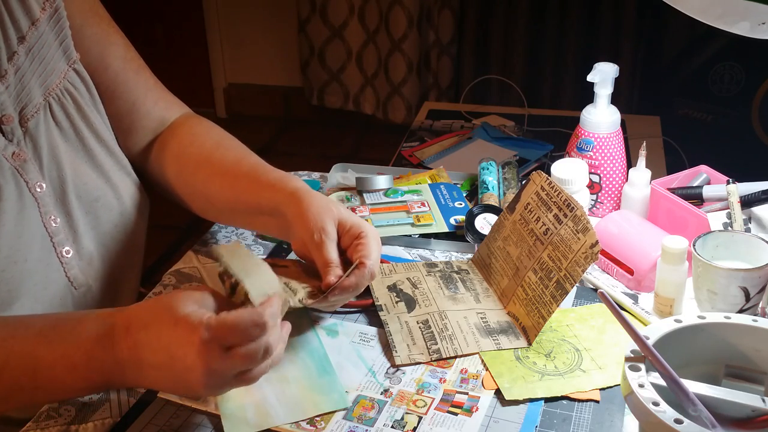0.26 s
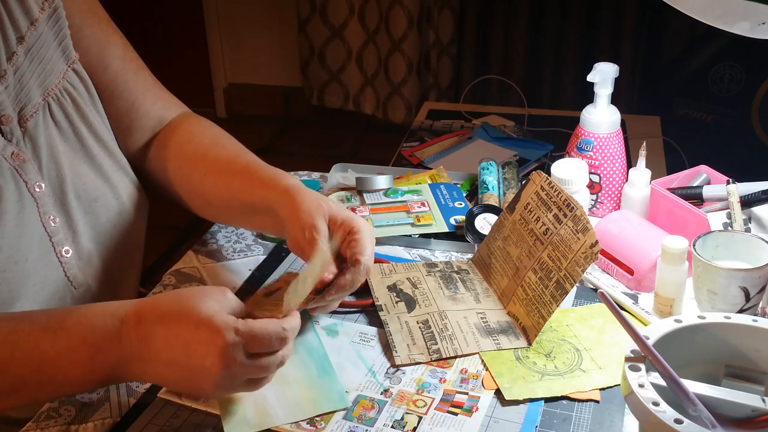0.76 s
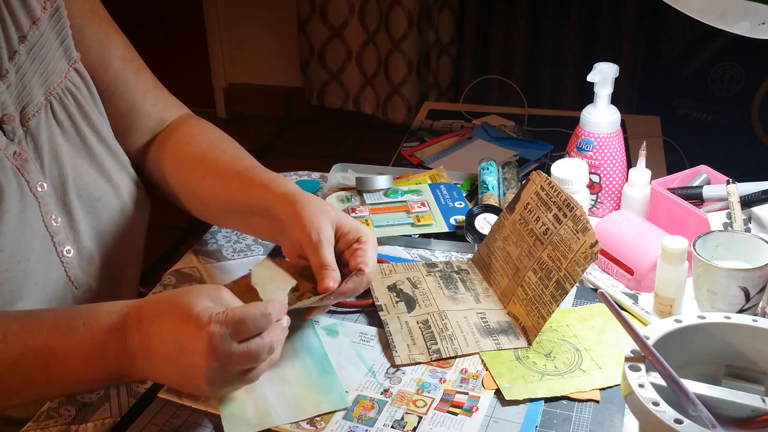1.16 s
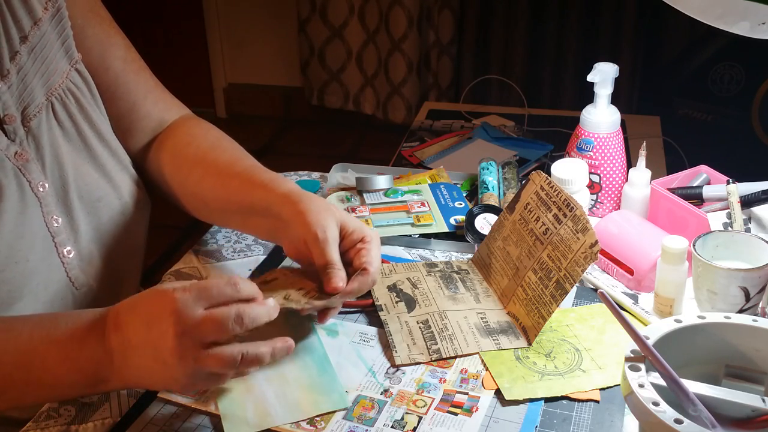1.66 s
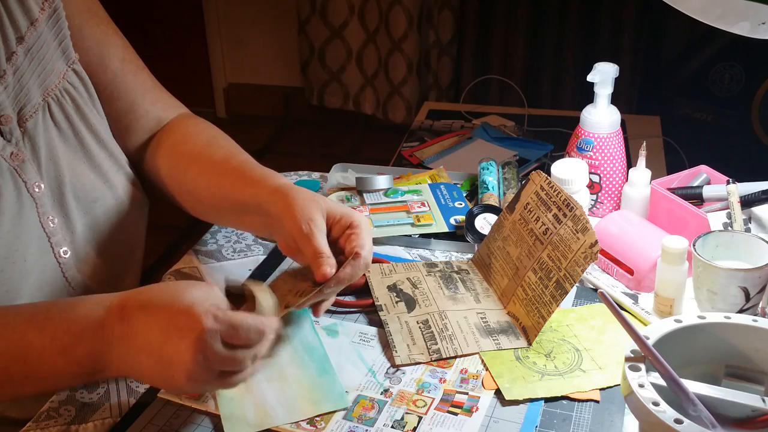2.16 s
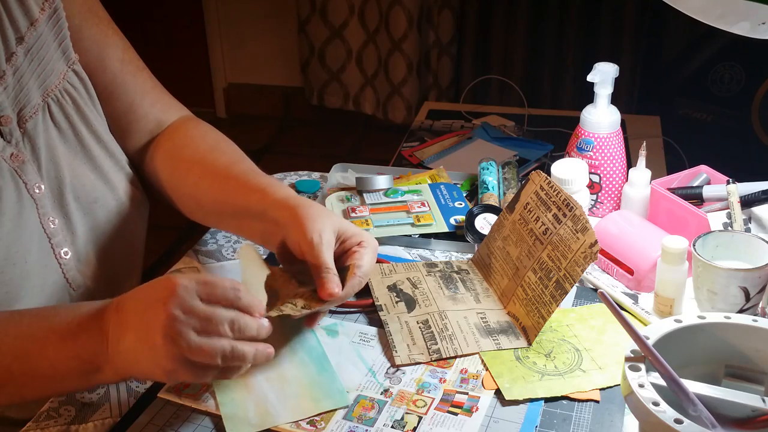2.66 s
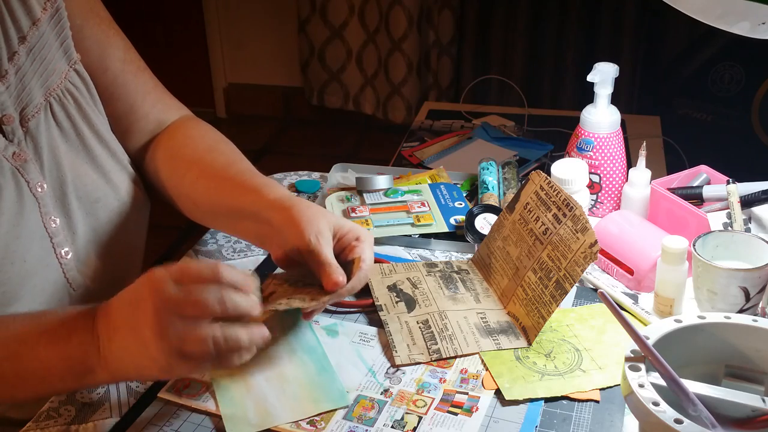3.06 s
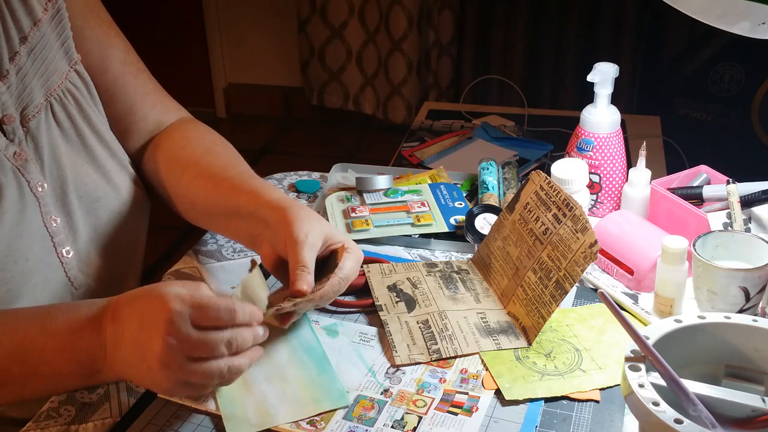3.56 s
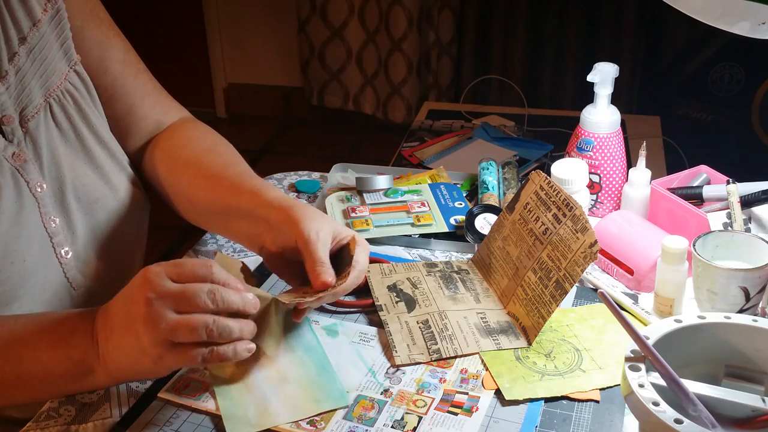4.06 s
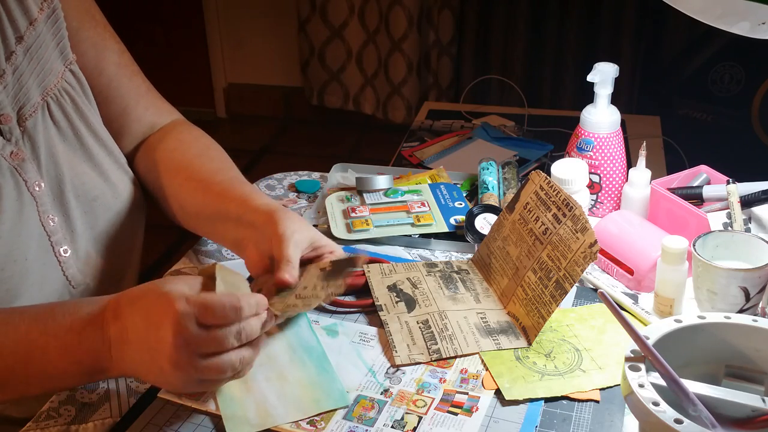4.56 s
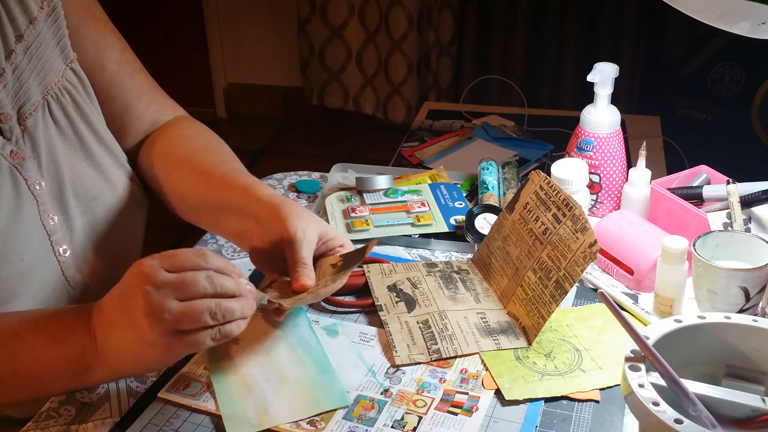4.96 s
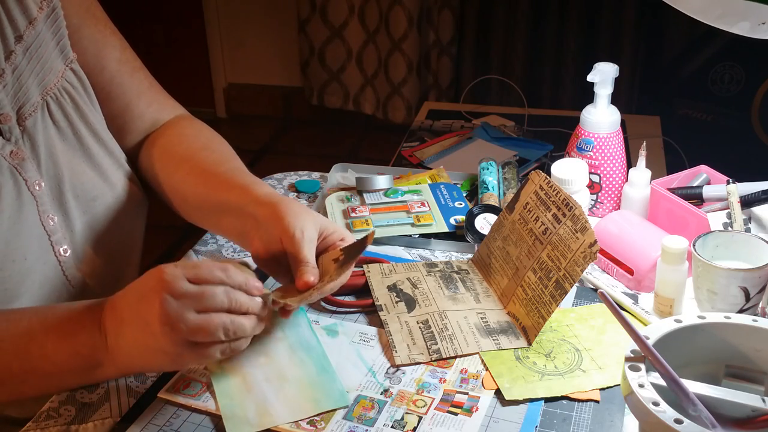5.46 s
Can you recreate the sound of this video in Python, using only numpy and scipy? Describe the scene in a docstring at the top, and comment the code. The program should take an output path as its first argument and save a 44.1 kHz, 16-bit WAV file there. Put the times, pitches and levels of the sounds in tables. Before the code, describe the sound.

Hands tear strips from stiff brown paper in short crisp pulls, with sharp snaps and light rustling, close up in a small room.

```python
"""Craft table in a small room: hands tear narrow strips off a sheet of brown paper in short pulls.
Each pull is a run of breaking fibres (dense random ringing grains); between pulls the grip shifts and rustles.
The stiff sheet snaps (noise cracks plus a flap) and buckles (resonant pops); an arm rubs the table dully.
Table and room answer with decaying noise, over air noise, a low hum and a faint whine.
A camera with two microphone ports stands close by; each port rings in the treble."""
import sys
import numpy as np
from scipy import signal
from scipy.fft import rfft, irfft, next_fast_len
from scipy.io import wavfile
from scipy.ndimage import uniform_filter1d, map_coordinates

SR = 44100
rng = np.random.default_rng(int(sys.argv[2]) if len(sys.argv) > 2 else 0)


def put_to_file(sound):
    """Save the sound as 16-bit audio at rate SR, in the file named by the first command-line argument."""
    columns = np.atleast_2d(sound).T  # one column per channel
    safe = np.clip(columns, -1, 1)
    whole_steps = np.round(safe * 32767)
    wavfile.write(sys.argv[1], SR, whole_steps.astype(np.int16))


N = 252482  # samples


def amp(db):
    """Decibels to gain."""
    return 10 ** (np.asarray(db) / 20)


def unit(x):
    """Scale x to rms 1."""
    return x / np.sqrt(np.mean(x ** 2) + 1e-20)


def along(points, hz):
    """Interpolate (f/Hz, value) points on a log frequency axis."""
    point_hz, values = np.transpose(points)
    return np.interp(np.log(hz + 1), np.log(point_hz), values)


def wobble(knots_per_s):
    """Smooth random curve through normal-distributed knots."""
    knots = rng.standard_normal(int(N * knots_per_s / SR) + 4)
    return map_coordinates(knots, [np.arange(N) * knots_per_s / SR])


def filtered(x, response):
    """Apply a complex response(hz) in the frequency domain."""
    size = next_fast_len(N + SR // 2)
    hz = np.fft.rfftfreq(size, 1 / SR)
    return irfft(rfft(x, size) * response(hz), size)[..., :N]


def add(track, start_s, sound):
    """Mix sound into track in place, cut at the track end."""
    part = track[max(round(start_s * SR), 0):][:len(sound)]
    part += sound[:len(part)]


SPLIT_HZ = 3000


def halves(x):
    """Split at SPLIT_HZ into crisp top and low body."""
    filters = [signal.butter(N=3, Wn=SPLIT_HZ, btype=side, fs=SR, output="sos") for side in ("high", "low")]
    return [signal.sosfilt(sos, x) for sos in filters]


def burst(t60_s):
    """Decaying noise puff of energy 1 with a nearly flat spectrum."""
    t = np.arange(SR // 20) / SR
    half_fade = amp(-30 * t / t60_s)  # applied twice: -60 dB at t60_s
    phases = np.angle(rfft(rng.standard_normal(len(t)) * half_fade))
    puff = irfft(np.exp(1j * phases), len(t)) * half_fade
    return puff / np.linalg.norm(puff)


def strokes(rows, start_db, end_db, onset_s, fade_s):
    """Gain curve per level column: each stroke swells to its peak, eases off and stops."""
    t, gains = np.arange(N) / SR, 0
    for start_s, rise_s, fall_s, *levels_db in rows:
        since = t - start_s
        force = amp(np.interp(since, [0, rise_s, rise_s + fall_s], [start_db, 0, end_db]))
        fade_in = np.clip(1 + since / onset_s, 0, 1)
        fade_out = np.clip(1 - (since - rise_s - fall_s) / fade_s, 0, 1)
        gains = gains + amp(levels_db)[:, None] * force * fade_in * fade_out
    return gains


def crackle(rate_hz, spread_db, clump_db, clump_hz, ring_s, spot_count):
    """Tiny breaks in clumps, each ringing like one of spot_count sheet spots: (crisp, body), rms 1."""
    happens = rng.random(N) < rate_hz / SR
    spread = spread_db * np.clip(rng.standard_normal(N), -2, 2)
    sizes = happens * amp(spread + clump_db * wobble(clump_hz))
    # the hand feeds in energy evenly, so big breaks are offset by lulls
    local_power = np.abs(uniform_filter1d(sizes ** 2, size=SR // 60))
    sizes = sizes / np.sqrt(local_power + 1e-6)
    spots = np.array([burst(ring_s)[:SR // 100] for _ in range(spot_count)])
    at = np.flatnonzero(sizes)
    signed_sizes = sizes[at] * rng.choice([-1, 1], len(at))
    breaks = signed_sizes[:, None] * spots[rng.integers(spot_count, size=len(at))]
    samples = at[:, None] + np.arange(breaks.shape[1])
    sound = np.bincount(samples.ravel(), breaks.ravel(), N)[:N]
    return np.array([unit(half) for half in halves(sound)])


# tearing pulls: t/s, tightening/s, easing/s, crisp level/dB, body level/dB (before trim)
TEAR_PULLS = [(0.164, 0.022, .048, -28, -39.5), (1.512, .035, 0.03, -44, -46),
              (1.7, 0.068, 0.059, -31.5, -36), (2.772, .028, .014, -32, -39.5),
              (2.936, .012, .115, -29, -36.5), (3.098, 0.0085, 0.023, -33, -41.5),
              (3.758, 0.029, .065, -30, -35), (3.878, 0.019, 0.059, -31, -39),
              (3.982, .09, 0.0573, -29, -37.5), (4.857, .004, 0.037, -34, -42.5),
              (4.963, 0.026, 0.064, -27.5, -36), (5.556, 0.046, 0.034, -32, -40),
              (5.69, 0.022, 0.052, -32, -43.5)]
CATCH_DB, LET_GO_DB = -7, -8  # start and end of a pull, re its hardest moment


def tearing(rate_hz=1400, usual_crisp_db=-35, trim_db=((-2,), (-3.2,))):
    """Fibres break by the thousand, in fits; a harder pull is louder and denser."""
    gains = strokes(TEAR_PULLS, CATCH_DB, LET_GO_DB, onset_s=0.0028, fade_s=0.0105)
    pace = np.clip(np.sqrt(gains[0] / amp(usual_crisp_db)), .5, 2)
    fibres = crackle(rate_hz * pace, spread_db=6, clump_db=5, clump_hz=230, ring_s=.003, spot_count=200)
    return np.sum(fibres * gains * amp(trim_db), axis=0)


# sheet snaps: t/s, level/dB, relative flap level/dB (before the gains in snaps)
SHEET_SNAPS = [(0.016, -36.5, -15), (0.031, -27.5, -19.5), (0.131, -23.5, -21), (0.15, -24, -23),
               (0.327, -20.5, -23.5), (0.585, -37.5, -14), (0.606, -46, -5.5), (0.998, -41.5, -16),
               (1.271, -47.5, -25), (1.386, -36, -26.5), (1.403, -23, -26.5), (1.47, -27, -18),
               (1.507, -27.5, -18), (1.547, -25, -29), (1.701, -22, -20.5), (1.727, -17, -23.5),
               (1.763, -18, -18), (1.8, -15, -20.5), (1.84, -22, -34), (2.306, -27, -35),
               (2.619, -33.5, -8.5), (2.641, -30, -19), (2.647, -13, -19), (2.769, -15, -22),
               (2.775, -22, -19.5), (2.795, -9.5, -28), (2.803, -18.5, -13.5), (2.9, -20, -21.5),
               (2.932, -15, -22), (2.939, -11.5, -21), (2.972, -33, -12), (3.013, -26, -13.5),
               (3.041, -24.5, -11), (3.081, -12.5, -24.5), (3.102, -23, -12.5), (3.173, -33, -14),
               (3.581, -32.5, -22), (3.735, -32.5, -21), (3.755, -16, -22.5), (3.787, -10.5, -22),
               (3.837, -25, -16), (3.874, -14.5, -19), (3.928, -25, -20), (3.98, -25, -20.5),
               (4.035, -30, -19), (4.073, -32, -10), (4.324, -35, -17.5), (4.855, -15.5, -21.5),
               (4.927, -22, -26), (4.943, -17.5, -24), (4.968, -14, -24), (5.192, -33.5, -16.5),
               (5.557, -30, -16), (5.598, -25, -16), (5.684, -20, -24), (5.693, -16.5, -23.5)]


def snaps(crack_t60_s=0.0044, rebound_mean_s=.0015, rebound_db=-6, flap_t60_s=0.037, crack_db=8, flap_db=21):
    """A crease gives way: sharp crack, a second one just after, and a longer flap of the sheet."""
    track = np.zeros(N)
    for start_s, level_db, body_db in SHEET_SNAPS:
        flap = halves(burst(flap_t60_s))[1]
        snap = amp(body_db + flap_db) * flap / np.linalg.norm(flap)
        crack = halves(burst(crack_t60_s))[0]
        add(snap, 0, amp(crack_db) * crack)
        rebound = halves(burst(crack_t60_s))[0]
        rebound_s = rebound_mean_s * (.5 + rng.random())
        add(snap, rebound_s, amp(crack_db + rebound_db) * rebound)
        add(track, start_s + .0005, amp(level_db) * snap)
    return track


# finger shifts: t/s, swelling/s, dying/s, crisp level/dB, body level/dB (before trim)
FINGER_SHIFTS = [(0.02, 0.017, 0.057, -51, -54), (0.122, 0.041, .01, -42, -49),
                 (0.268, 0.035, 0.016, -49, -47.5), (0.325, 0.031, 0.087, -44.5, -50),
                 (0.565, 0.05, .035, -54, -51), (0.68, 0.0072, 0.013, -58, -51),
                 (0.734, 0.004, 0.021, -47.5, -46.5), (0.85, 0.0068, .04, -61.5, -57),
                 (0.93, 0.093, 0.092, -58.5, -60.5), (1.675, .02, .01, -57, -55),
                 (1.84, 0.034, 0.044, -41.5, -46), (1.955, 0.019, 0.017, -44, -42.5),
                 (2.19, 0.036, 0.034, -68, -86), (2.302, 0.0093, 0.028, -42, -41.5),
                 (2.36, 0.028, 0.098, -54, -59), (2.48, 0.091, 0.14, -60, -57),
                 (2.622, 0.037, 0.06, -41.5, -46.5), (2.75, 0.017, .01, -43.5, -51),
                 (3.41, 0.0055, 0.029, -56, -60), (3.46, .04, 0.079, -61, -61.5),
                 (3.555, 0.035, 0.074, -53, -55.5), (3.695, 0.0082, 0.028, -62, -56),
                 (4.275, .05, 0.11, -52.5, -57), (4.44, 0.016, 0.11, -57, -65),
                 (4.66, .03, 0.024, -63, -67), (4.728, 0.023, 0.023, -52.5, -45),
                 (4.825, .025, 0.0046, -56.5, -55.5), (5.13, .065, 0.034, -53.5, -54),
                 (5.255, 0.022, 0.018, -60.5, -57.5), (5.335, 0.039, .01, -65, -61),
                 (5.39, .02, 0.022, -49, -54.5), (5.48, 0.081, .02, -52.5, -53)]
TOUCH_DB, LIFT_DB = -6.5, -13  # touch-down and lift-off, re the firmest moment


def rustling(trim_db=((-3,), (-4,))):
    """Paper slides over paper and fingertips in fine grains."""
    grains = crackle(rate_hz=2000, spread_db=8, clump_db=7.5, clump_hz=110, ring_s=0.0039, spot_count=200)
    gains = strokes(FINGER_SHIFTS, TOUCH_DB, LIFT_DB, onset_s=0.023, fade_s=0.0077)
    return np.sum(grains * gains * amp(trim_db), axis=0)


# soft pops of the bending sheet: t/s, level/dB (before pop and tick gains), f/Hz
SHEET_POPS = [(0.078, -40.5, 921), (0.293, -39.5, 1150), (0.587, -65, 930), (0.606, -42, 2480),
              (0.639, -51, 750), (0.735, -41.5, 2040), (0.962, -42.5, 1790), (1.03, -49.5, 1090),
              (1.408, -39.5, 1430), (1.473, -42, 1260), (1.513, -42.5, 770), (1.552, -46, 766),
              (1.972, -55, 1450), (2.033, -48, 1710), (2.068, -49.5, 2100), (2.278, -46.5, 2070),
              (2.547, -48, 1170), (2.586, -42.5, 947), (2.647, -40, 1810), (3.282, -50, 736),
              (3.551, -47, 1670), (3.58, -45, 915), (3.779, -30.5, 752), (3.788, -27, 1520),
              (4.325, -50.5, 1120), (4.459, -42.5, 2180), (4.508, -49.5, 743), (4.744, -47.5, 1577)]


def buckles(pop_t60_s=0.021, tick_t60_s=0.0084, q=1.6, pop_db=15, tick_db=2):
    """A patch flips over: a short puff through one broad resonance, applied twice, with a faint tick."""
    track = np.zeros(N)
    for start_s, level_db, hz in SHEET_POPS:
        patch = signal.iirpeak(hz, q, fs=SR)
        pop = signal.lfilter(*patch, signal.lfilter(*patch, burst(pop_t60_s)))
        pop = pop / np.linalg.norm(pop)
        tick = burst(tick_t60_s)
        add(track, start_s, amp(level_db + pop_db) * pop + amp(level_db + tick_db) * tick)
    return track


# forearm and sheet brush the table: t/s, swelling/s, dying/s, level/dB (before brush_db)
TABLE_BRUSHES = [(0.3, 0.097, 0.14, -54), (1.85, .15, .08, -61), (4.2, 0.14, 0.19, -55)]
# rub spectrum: f/Hz, relative density/dB
RUB_SPECTRUM = [(40, -14), (90, -4.5), (220, 1), (400, -15), (900, -16), (3000, -29.5)]


def brushing(brush_db=-3):
    """Dull, faint rub as the arm shifts: shaped noise in slow strokes."""
    rub = unit(filtered(rng.standard_normal(N), lambda hz: amp(along(RUB_SPECTRUM, hz))))
    gain = strokes(TABLE_BRUSHES, start_db=-1, end_db=-5, onset_s=0.019, fade_s=0.024)[0]
    return amp(brush_db) * rub * gain


# room decay: f/Hz, t60/s
ROOM_DECAY = [(200, 0.82), (1000, 0.31), (4000, 0.38), (9000, 0.3), (15000, 0.28)]


def tail():
    """Two-channel noise tail, left energy 1; decay time depends on frequency, longest in the bass."""
    hz, t, spectrum = signal.stft(rng.standard_normal((2, SR // 2)), SR, nperseg=256)
    decay = amp(-60 * t / along(ROOM_DECAY, hz)[:, None])
    wash = signal.istft(spectrum * decay, SR, nperseg=256)[1]
    wash = wash * np.clip(np.arange(wash.shape[1]) / SR / 0.0037, 0, 1)  # 3.7 ms build-up
    return wash / np.linalg.norm(wash[0])


def in_room(x, lead_ms=0.089, direct_db=-4.0, table_db=-1, table_t60_s=0.033, room_db=-3.5, slices=64):
    """Sound reaches the left port first; table clutter and walls answer anew as the hands move."""
    ports_sign = np.array([[1], [-1]])  # half the lead on each port
    direct = filtered(x, lambda hz: np.exp(1j * np.pi * hz * lead_ms / 10 ** 3 * ports_sign))
    echoes = np.zeros((2, N))
    for part in np.array_split(np.arange(N), slices):
        for ear, wash in zip(echoes, tail()):
            answer = amp(room_db) * wash
            add(answer, 0, amp(table_db) * burst(table_t60_s))
            add(ear, part[0] / SR + .0003, signal.fftconvolve(x[part], answer))
    return amp(direct_db) * direct + diffuse(echoes)


# likeness of the ports in diffuse sound: f/Hz, left-right correlation [-]
PORT_LIKENESS = [(50, 0.82), (300, 0.63), (700, 0.37), (1500, 0.13), (2500, 0)]


def diffuse(pair):
    """Sound from all around: the ports share the bass but get unrelated treble."""
    def mid_side_gains(hz):
        turn = np.arccos(np.clip(along(PORT_LIKENESS, hz), -1, 1)) / 2
        return np.array([np.cos(turn), np.sin(turn)])

    mid, side = filtered(pair, mid_side_gains)
    return np.array([mid + side, mid - side])


# microphone ports, left then right: resonance f/Hz, width/Hz, lift/dB, gain/dB
MIC_PORTS = [(7410, 970, 15, 0.73), (8415, 870, 16, 3)]


def ports(hz):
    """The small cavity before each microphone rings in the treble: one resonant lift per port."""
    responses = []
    for centre_hz, width_hz, lift_db, gain_db in MIC_PORTS:
        damping = 1j * hz * width_hz
        resonance = damping / (centre_hz ** 2 - hz ** 2 + damping)
        responses.append(amp(gain_db) * (1 + (amp(lift_db) - 1) * resonance))
    return np.array(responses)


# still air: f/Hz, relative density/dB
AIR_SPECTRUM = [(25, -15), (50, 4.5), (100, -3), (150, 3.5), (300, 0), (550, -4), (1100, -10.5),
                (1500, -18.5), (6000, -20.5), (8000, -17.5), (10000, -20), (14000, -25)]
# hum and faint whine: f/Hz, mean level/dB rms (before the channel trim)
HUM_TONES = [(50, -71), (83, -73), (167, -70), (222, -71.5), (7241, -82)]


def room_tone(air_db=-60.5, waver_db=2):
    """Low air noise plus sines whose level and phase waver."""
    air = diffuse(filtered(rng.standard_normal((2, N)), lambda hz: amp(along(AIR_SPECTRUM, hz))))
    t, hum = np.arange(N) / SR, 0
    for hz, level_db in HUM_TONES:
        level = amp(level_db + waver_db * wobble(5.02)) * np.sqrt(2)
        hum = hum + level * np.sin(2 * np.pi * hz * t + .5 * wobble(12))
    return amp(air_db) * unit(air) + hum


# breaking paper: f/Hz, relative density/dB
PAPER_SPECTRUM = [(50, -31), (150, -2.5), (350, -5.5), (700, 1.5), (1200, -0.5), (1800, 1.5), (2700, -1.5),
                  (3700, 1.5), (5500, 0), (8000, -4.5), (11000, -1), (14000, -2.5)]


def scene(paper_db=-1.5, background_trim_db=((-1,), (1,))):
    """Paper through room and ports, plus brushing and room tone trimmed per channel."""
    dry_paper = tearing() + snaps() + rustling() + buckles()
    paper = filtered(dry_paper, lambda hz: amp(along(PAPER_SPECTRUM, hz)))
    background = brushing() + room_tone()
    return amp(paper_db) * filtered(in_room(paper), ports) + background * amp(background_trim_db)


TOP_HZ = 14680


def record(dry):
    """The camera's band limit: a very steep low-pass at TOP_HZ."""
    return filtered(dry, lambda hz: 1 / np.sqrt(1 + (hz / TOP_HZ) ** 260))


dry = scene()
out = record(dry)
put_to_file(out)
```